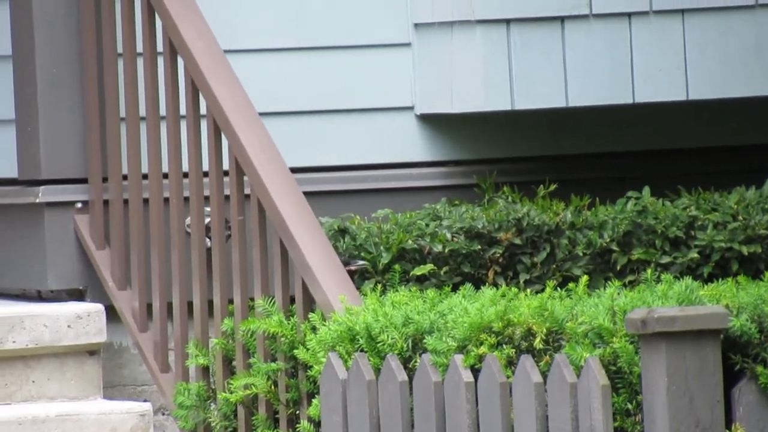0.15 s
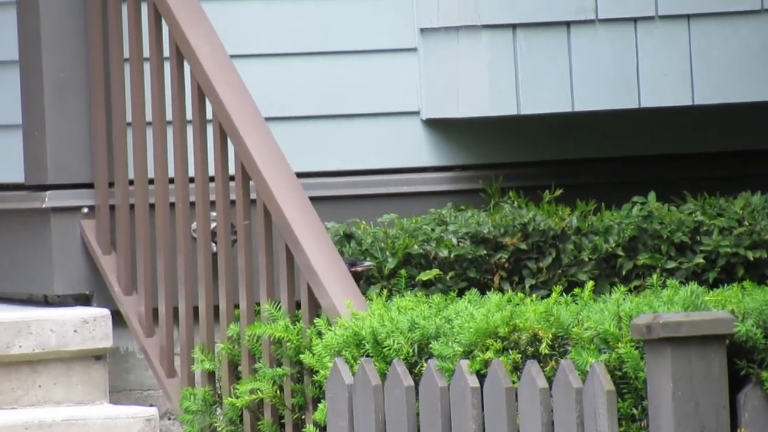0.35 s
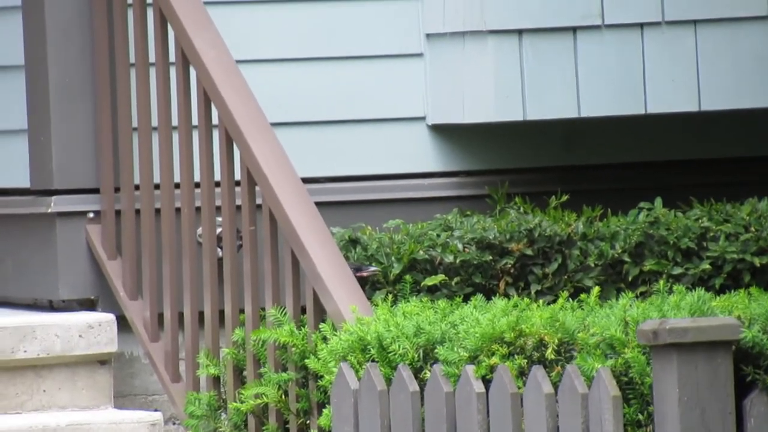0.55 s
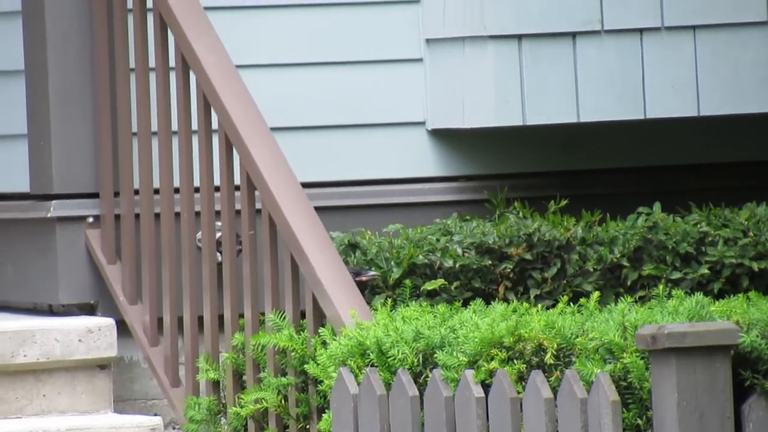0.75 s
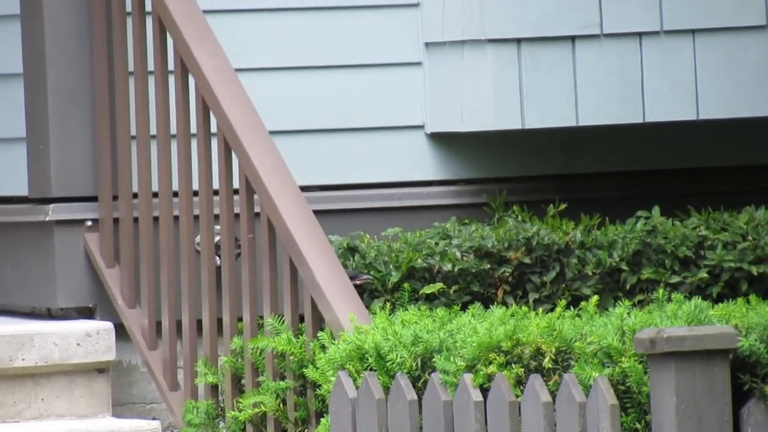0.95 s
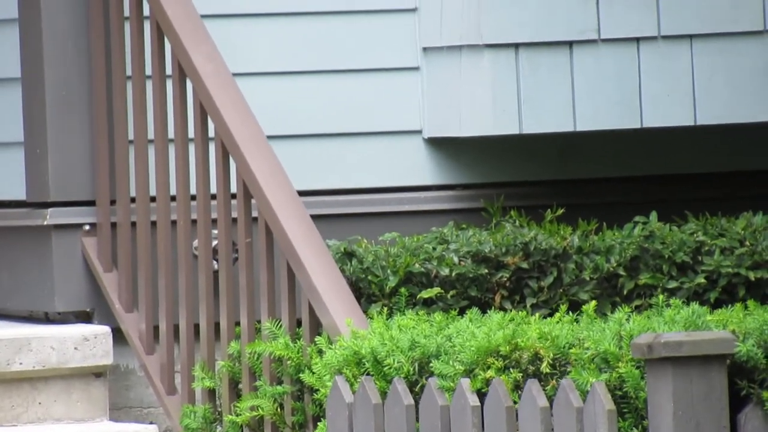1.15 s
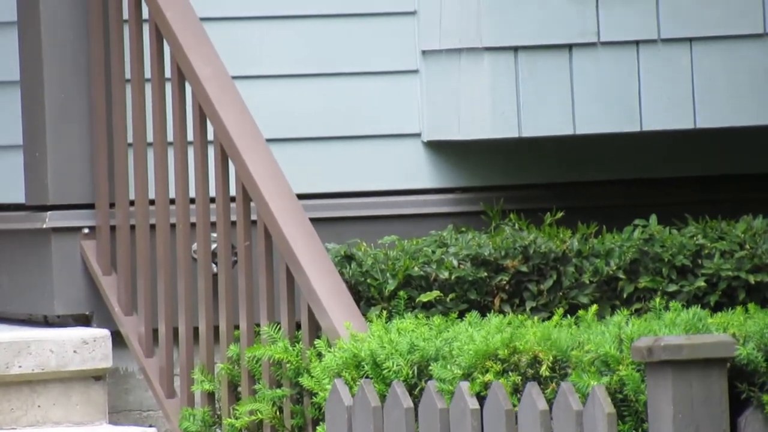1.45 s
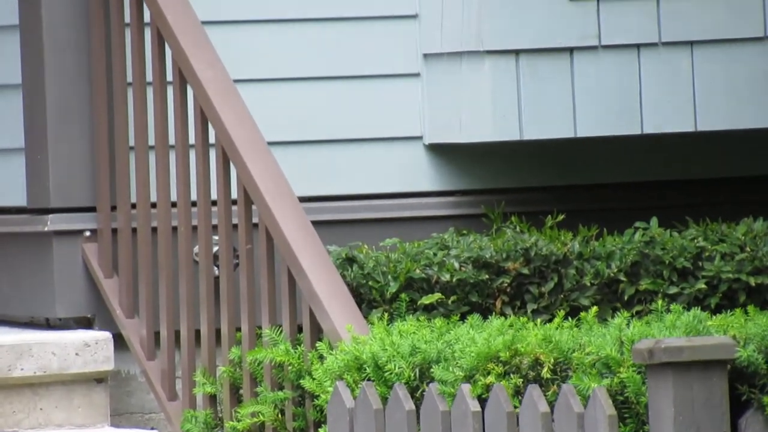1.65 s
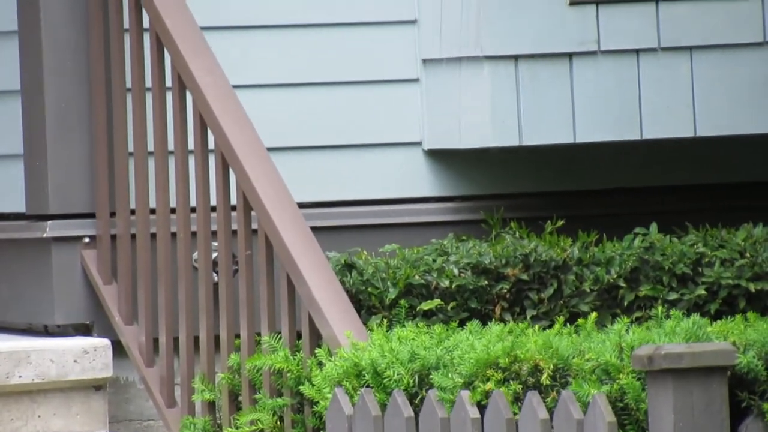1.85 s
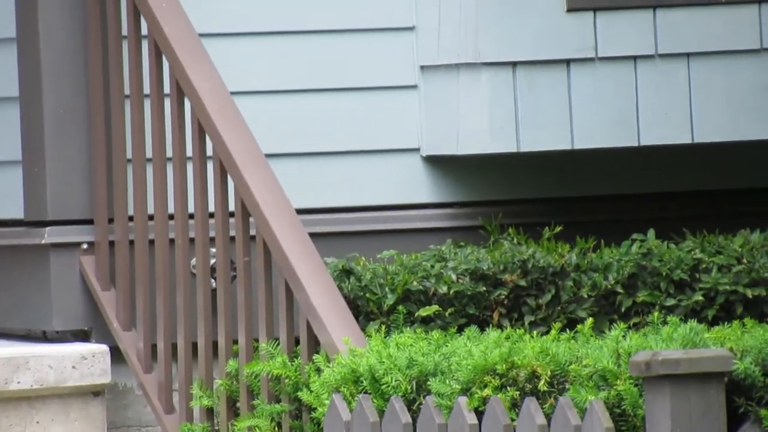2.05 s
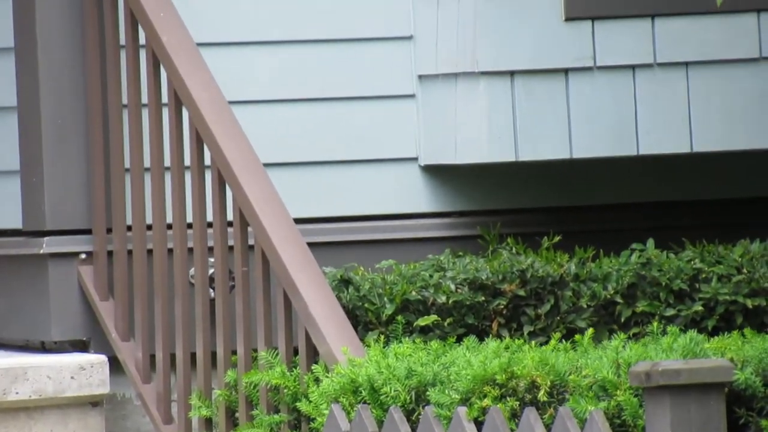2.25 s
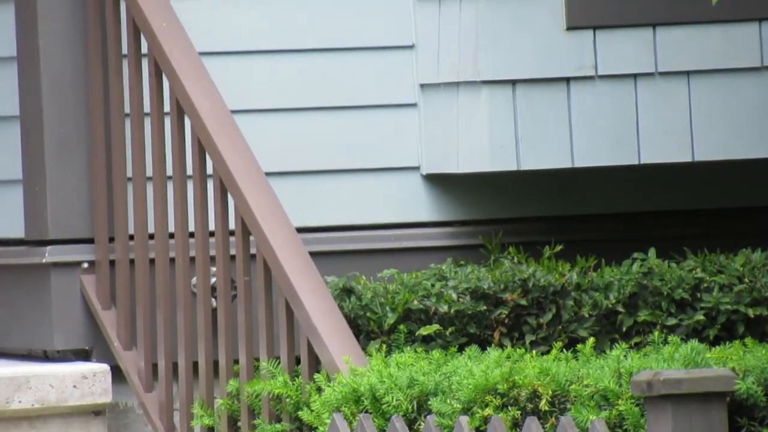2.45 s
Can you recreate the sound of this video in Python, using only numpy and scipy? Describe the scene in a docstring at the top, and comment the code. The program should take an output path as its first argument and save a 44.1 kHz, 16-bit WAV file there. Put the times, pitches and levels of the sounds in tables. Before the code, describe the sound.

A crow caws four times, each about a third of a second, scooping up then sagging: a dull, nasal one at 0.2 s, harsher ones at 0.8, 1.4 and 2.0 s, with short wall echoes. A faint tick comes at 0.07 s, a soft low thump at 1.3 s. A distant engine rises from 1.1 to 2.2 s, then eases; a far crow answers at 1.9 s. Steady low neighbourhood wash, mono.

```python
"""A crow caws four times in a yard between houses: once dull, with its beak little open, then three times harsher.
Each caw is a train of uneven syrinx pulses whose rate scoops up and sags; they ring the throat and echo off walls.
Under it lies the low wash of the neighbourhood, with a faint tick, a soft thump and an engine some streets away
that speeds up, then eases a little. Another crow answers far off, as a few harmonics with a trace of echo.
The recorder is mono, the same in both channels, and cuts the top treble."""
import sys
import numpy as np
from scipy import signal
from scipy.fft import rfft, irfft
from scipy.io import wavfile

SR = 44100
rng = np.random.default_rng(int(sys.argv[2]) if len(sys.argv) > 2 else 0)


def waveform_to_disk(signal):
    """Save audio, clipped to [-1, 1], as 16-bit WAV at the path in sys.argv[1]."""
    frames = np.transpose(np.atleast_2d(signal))
    scaled = np.clip(frames, -1, 1) * 32767
    samples = np.round(scaled).astype(np.int16)
    wavfile.write(sys.argv[1], SR, samples)


N = 114660
T = np.arange(N) / SR  # s
FREQS = np.maximum(np.fft.rfftfreq(N, 1 / SR), 1)  # Hz

# Neighbourhood wash, its colour before scaling to rms 1: (frequency [Hz], relative density [dB])
TOWN_COLOUR = [(20, -22), (35, -9), (60, -1), (115, -1.5), (160, -6.5), (220, -1.5), (400, -5.5), (800, -2),
               (1100, -5), (1600, -5.5), (2700, -19), (4500, -25), (7000, -28), (15000, -38)]
TOWN_DB = -42.5

# Engine some streets away: (time [s], cycle rate before wander [Hz], level before partial gains [dB])
ENGINE_RUN = [(1.1, 40, -54.5), (1.35, 43.2, -45), (1.562, 46.52, -46), (1.722, 52.57, -43.5),
              (1.852, 55.5, -45), (2.0, 57.9, -42), (2.2, 58.72, -48.5), (2.311, 57.16, -49),
              (2.42, 57.2, -50), (2.6, 55.8, -56)]
# Engine partials: (multiple of cycle rate [-], level before swells [dB])
ENGINE_PARTIALS = [(2, -9.5), (3, -10), (4, -4.5)]
# Swells of single engine partials: (time [s], width [s], multiple of cycle rate [-], boost [dB])
ENGINE_BOOMS = [(1.57, 0.062, 4, 9.5), (1.87, .1, 4, 8.5), (2.14, 0.095, 3, 13), (2.301, 0.018, 4, 13.5)]

TICK_S, TICK_HZ, TICK_DB, TICK_DECAY_S = 0.066, 8000, -52, 0.007

# Near caws: (start [s], length [s], level before envelope and yard [dB], attack [s],
# pitch before scoop and sag [Hz], sag [share], fade by the end [dB], beak opening [0-1],
# throat frequency scale [-], top treble [dB], pulse jitter [cycles], yard send against direct [dB])
NEAR_CAWS = [(0.198, 0.33, -21.5, 0.059, 650.8, .27, 7, 0.21, 1.001, -1.5, 0.066, -5),
             (0.781, 0.31, -19, 0.034, 586.5, 0.33, 9, 0.57, 0.984, 5.5, 0.057, -3),
             (1.398, .34, -22, 0.031, 600.4, .37, 8.5, 0.88, 0.992, 3, 0.047, -8.5),
             (2.018, 0.26, -22, 0.022, 613, 0.36, 8.5, 0.88, 0.998, -2, 0.052, -8.5)]
# Throat and beak resonances: (frequency before scale [Hz], width [Hz],
# relative level with beak half shut [dB], relative level with beak wide open [dB])
THROAT_RESONANCES = [(599, 340, -25.5, -17.5), (1145, 510, -14, -13.5), (1531, 193, 4, -1),
                     (1793, 485, -7.5, 0.5), (2294, 405, -19.5, -2.5), (3245, 320, -29, -10.5),
                     (3703, 384, -23, -7), (4905, 910, -31.5, -19), (5390, 700, -22, -26),
                     (6540, 770, -23, -20), (7130, 820, -34.5, -9), (8050, 780, -31, -21.5),
                     (9420, 1080, -36, -23.5), (11160, 760, -47.5, -24), (12500, 1800, -51, -31.5)]
SCOOP, SCOOP_S = 0.42, 0.043  # pitch starts low by this share; rise time
WOBBLE, WOBBLE_RATE_HZ = 0.00781, 42.5  # unsteady pitch: share, fastest wander
LIMP_CYCLES = 0.041  # pulses come alternately late and early
SHIMMER_DB, RASP_DB = 1.63, -10.5  # scatter of pulse size; air noise against pulses
ONSET_DB, RELEASE_S = -8, 0.0017  # starting level against full; decay after the caw's length
CATCH_S, CATCH_WIDTH_S, CATCH_DB = 0.0059, 0.0023, -16  # dip after the first pulses
SOFT_HZ, SOFT_SHARE = 2680, 0.21  # above this, level changes grow by this share in dB
TOP_TREBLE_HZ = 10000  # edge of the top treble

# Echoes from nearby walls: (delay behind the direct sound [s], level before treble loss [dB])
WALL_ECHOES = [(.0061, -13.5), (0.0122, -15), (.029, -14.5), (.083, -23.5)]
YARD_T60_S, YARD_TREBLE_T60_S, YARD_TREBLE_DB = 0.52, 0.29, 7.5

THUMP_S, THUMP_HZ, THUMP_DB, THUMP_DECAY_S = 1.295, 68.5, -35, 0.057

# Answering crow: (start [s], length [s], level before harmonic gains [dB],
# starting pitch before wobble [Hz], sag [share])
FAR_CAWS = [(1.896, 0.13, -45, 400.6, 0.0555)]

RECORDER_TOP_HZ = 15200


def undb(db):
    """Amplitude factor for a level in dB."""
    return 10 ** (np.asarray(db) / 20)


def unit(x):
    """Scale to rms 1."""
    return x / np.sqrt(np.mean(x ** 2) + 1e-18)


def walk(rate_hz):
    """Slow random wander of rms 1: white noise kept mostly below the given rate."""
    spectrum = rfft(rng.standard_normal(N))
    return unit(irfft(spectrum / (1 + (FREQS / rate_hz) ** 4), N))


def resonance(hz, width_hz):
    """Gain of a steep resonance at every frequency."""
    return 1 / (1 + ((FREQS ** 2 - hz ** 2) / (FREQS * width_hz)) ** 2)


def noise(gain):
    """Noise of rms 1 with the given colour."""
    return unit(irfft(rfft(rng.standard_normal(N)) * gain, N))


def ring(x, gain):
    """Minimum-phase filter: it has the given gain and rings only after each sound."""
    cepstrum = irfft(np.log(gain + 1e-6), N)
    # Folding the cepstrum forward makes the response causal.
    cepstrum[1:N // 2] *= 2
    cepstrum[N // 2 + 1:] = 0
    return irfft(rfft(x) * np.exp(rfft(cepstrum)), N)


def town():
    """The nearly steady wash of far traffic and leaves: coloured noise with a slight drift in level."""
    hz, density_db = np.array(TOWN_COLOUR).T
    colour = undb(np.interp(np.log(FREQS), np.log(hz), density_db))
    return undb(TOWN_DB + 0.2 * walk(3.9)) * noise(colour)


def engine():
    """A motor some streets away: partials of its cycle rate swell in turn over a low rumble."""
    times, cycle_hz, level_db = np.array(ENGINE_RUN).T
    rate = np.interp(T, times, cycle_hz) * (1 + 0.0064 * walk(11))
    phase = 2 * np.pi * np.cumsum(rate) / SR
    tone = 0
    for multiple, partial_db in ENGINE_PARTIALS:
        partial_level = partial_db + 2.1 * walk(2.8)
        for when, width, boom_multiple, boost_db in ENGINE_BOOMS:
            if boom_multiple == multiple:
                partial_level = partial_level + boost_db * np.exp(-((T - when) / width) ** 2)
        tone = tone + undb(partial_level) * np.sin(multiple * phase)
    rumble = undb(-4) * noise(resonance(196, 170))
    return undb(np.interp(T, times, level_db)) * (np.sqrt(2) * tone + rumble)


def tick():
    """A faint, high tick before the first caw: resonant noise that dies away at once."""
    age = np.maximum(T - TICK_S, 0)
    envelope = (age > 0) * np.exp(-age / TICK_DECAY_S)
    return undb(TICK_DB) * envelope * noise(resonance(TICK_HZ, 8300))


def syrinx(hz, jitter):
    """One sharp pulse a cycle, each early or late and of its own size, with a puff of air behind it."""
    cycles = np.cumsum(hz) / SR
    k = np.arange(int(cycles[-1]))
    timing, size = rng.standard_normal((2, len(k)))
    at = np.interp(k + jitter * timing + LIMP_CYCLES * (-1) ** k, cycles, np.arange(N))
    # A windowed sinc places each pulse between samples.
    taps = at.astype(int)[:, None] + np.arange(-7, 9)
    offset = taps - at[:, None]
    clicks = np.sinc(offset) * np.sinc(offset / 8) * undb(SHIMMER_DB * size)[:, None]
    pulses = np.bincount((taps % N).ravel(), clicks.ravel(), N)
    air = np.exp(-(cycles % 1) / 0.17) * rng.standard_normal(N)
    return unit(pulses) + undb(RASP_DB) * unit(air)


def throat(opening, scale, top_db):
    """Gain of throat and beak at every frequency; an open beak is brighter."""
    power = 0
    for hz, width_hz, shut_db, open_db in THROAT_RESONANCES:
        peak_db = shut_db + opening * (open_db - shut_db)
        power = power + (undb(peak_db) * resonance(hz * scale, width_hz)) ** 2
    top_treble = undb(top_db / (1 + (TOP_TREBLE_HZ / FREQS) ** 4))
    return unit(np.sqrt(power) * top_treble)


def caw(start, length, db, attack_s, hz, sag, fade_db, opening, scale, top_db, jitter):
    """The voice catches, pitch and level climb quickly, then both sink as the air runs out."""
    age = np.clip(T - start, 0, length)
    part = age / length
    scoop = 1 - SCOOP * np.exp(-(age / SCOOP_S) ** 2)
    pitch = hz * (1 - sag * part) * scoop * (1 + WOBBLE * walk(WOBBLE_RATE_HZ))

    level_db = ONSET_DB * np.exp(-(age / attack_s) ** 2) - fade_db * part ** 2.14
    catch_db = CATCH_DB * np.exp(-((age - CATCH_S) / CATCH_WIDTH_S) ** 2)
    release = np.exp(-np.maximum(T - start - length, 0) / RELEASE_S)
    envelope = (T >= start) * undb(level_db + catch_db) * release
    pulses = syrinx(pitch, jitter) * envelope

    # Weak pulses are rounder: their treble drops further.
    round_part = irfft(rfft(pulses) / (1 + (FREQS / SOFT_HZ) ** 4), N)
    sharp_part = pulses - round_part
    pulses = round_part + sharp_part * undb(SOFT_SHARE * level_db)
    return undb(db) * ring(pulses, throat(opening, scale, top_db))


def yard(x):
    """Diffuse echo of house fronts and hedges: decaying noise whose treble dies first."""
    def decay(t60_s):
        return np.exp(-np.log(1000) * T / t60_s) * (1 - np.exp(-T / 0.016))

    bass_power = 1 / (1 + (FREQS / 3000) ** 4)
    low = irfft(rfft(rng.standard_normal(N)) * np.sqrt(bass_power), N)
    high = irfft(rfft(rng.standard_normal(N)) * np.sqrt(1 - bass_power), N)
    low_tail = low * decay(YARD_T60_S)
    high_tail = undb(YARD_TREBLE_DB) * high * decay(YARD_TREBLE_T60_S)
    echo = signal.fftconvolve(x, low_tail + high_tail)[:N]
    return echo / np.sqrt(np.sum(decay(YARD_T60_S) ** 2))


def crow():
    """The near crow: direct sound, delayed and duller wall echoes, and the tail of the yard."""
    direct, send = 0, 0
    for *shape, yard_db in NEAR_CAWS:
        # More yard means less direct sound.
        call = caw(*shape) / np.sqrt(1 + undb(yard_db) ** 2)
        direct = direct + call
        send = send + undb(yard_db) * call
    echoes = sum(undb(db) * np.interp(T - delay, T, direct, left=0) for delay, db in WALL_ECHOES)
    wall_gain = 1 / (1 + (FREQS / 5000) ** 2)
    return direct + ring(echoes, wall_gain) + yard(send)


def thump():
    """A soft, low bump: resonant noise with a quick rise and a short decay."""
    age = np.maximum(T - THUMP_S, 0)
    envelope = (1 - np.exp(-age / 0.0054)) * np.exp(-age / THUMP_DECAY_S)
    return undb(THUMP_DB) * envelope * noise(resonance(THUMP_HZ, 105))


def far_crow():
    """A short, clear caw far away: three harmonics, the bright one early and the low ones lingering."""
    out = 0
    for start, length, db, hz, sag in FAR_CAWS:
        part = np.clip((T - start) / length, 0, 1)
        pitch = hz * (1 - sag * part) * (1 + 0.004 * walk(40))
        phase = 2 * np.pi * np.cumsum(pitch) / SR
        bright = np.exp(-((part - 0.22) / 0.28) ** 2)
        gains = undb(3.5), undb(-5), undb(8.5) * bright  # second, third and fourth harmonic
        tone = sum(gain * np.sin(k * phase) for k, gain in enumerate(gains, 2))
        envelope = np.minimum(part / 0.12, 1) * (1 - part) ** 0.14
        out = out + undb(db) * envelope * tone
    return out + undb(-15) * yard(out)


def scene():
    """All sources together, the same in both channels."""
    mono = town() + engine() + tick() + crow() + thump() + far_crow()
    return np.array([mono, mono])


def record(dry):
    """A mono recorder that cuts the top with a steep low-pass."""
    top_cut = signal.ellip(10, 0.2, 80, RECORDER_TOP_HZ, fs=SR, output="sos")
    return signal.sosfilt(top_cut, dry)


dry = scene()
out = record(dry)
waveform_to_disk(out)
```